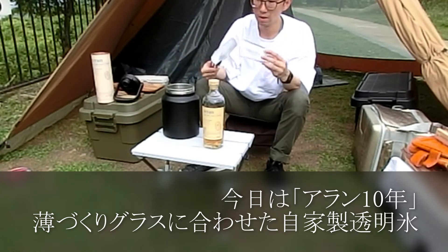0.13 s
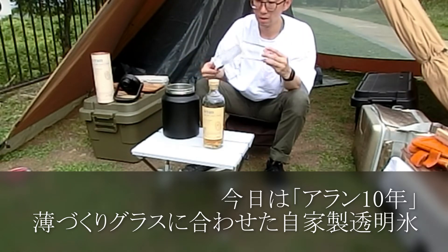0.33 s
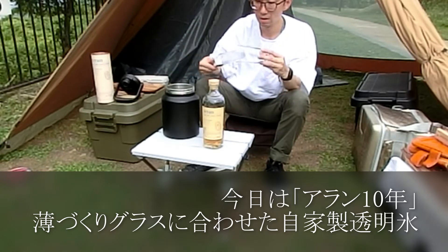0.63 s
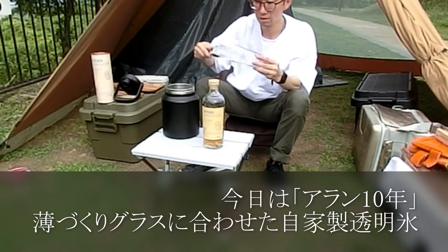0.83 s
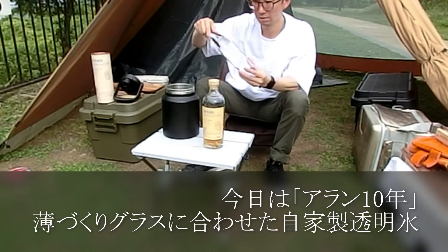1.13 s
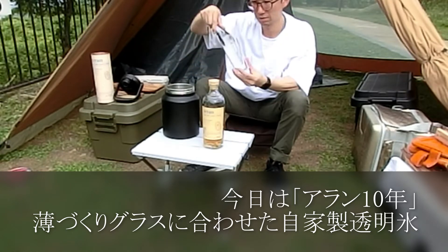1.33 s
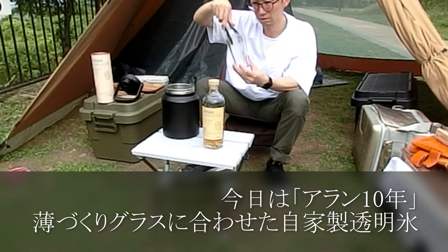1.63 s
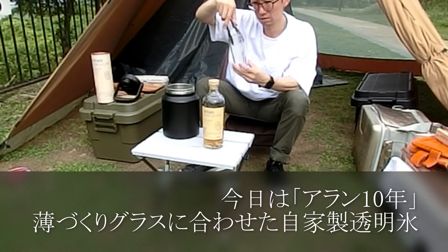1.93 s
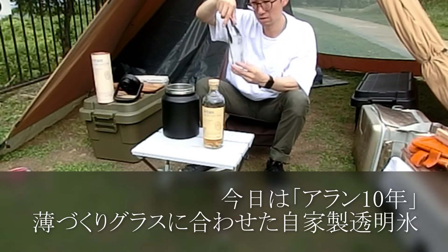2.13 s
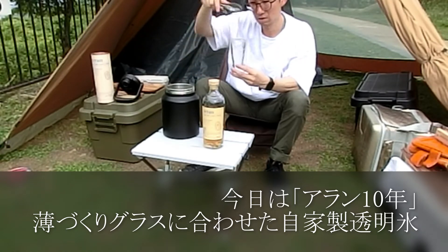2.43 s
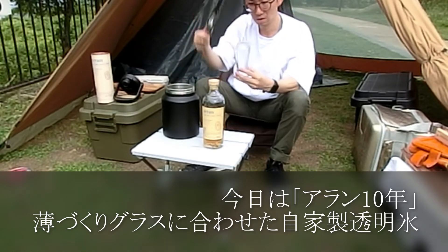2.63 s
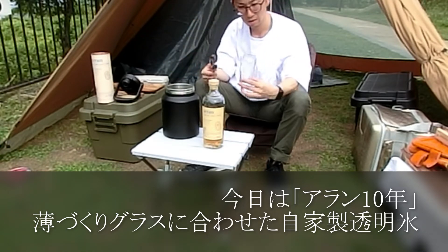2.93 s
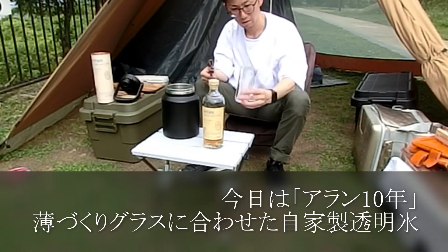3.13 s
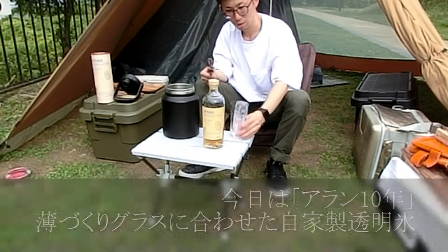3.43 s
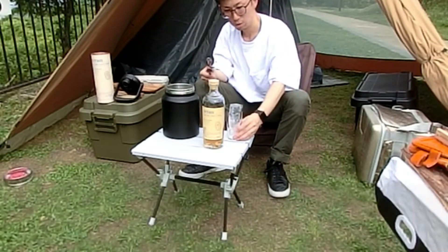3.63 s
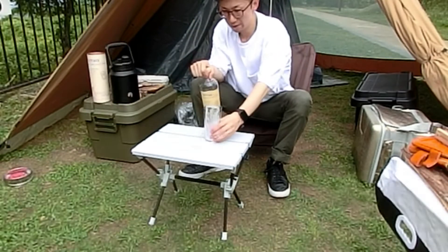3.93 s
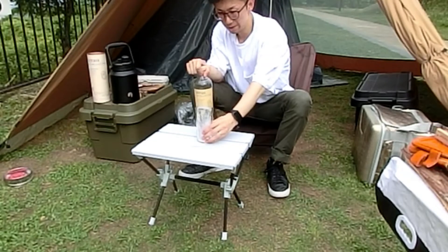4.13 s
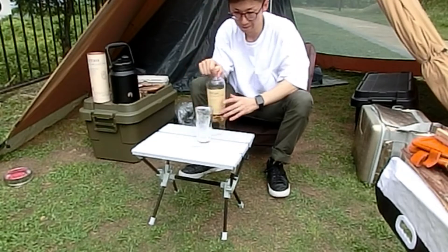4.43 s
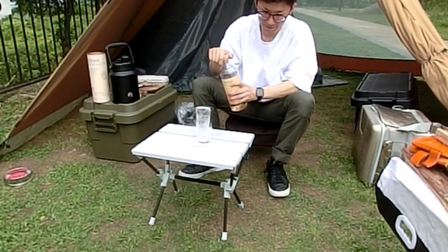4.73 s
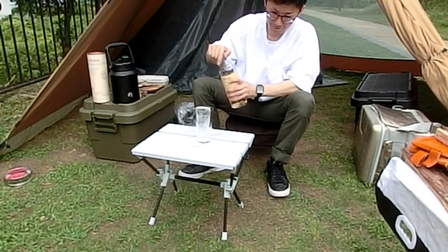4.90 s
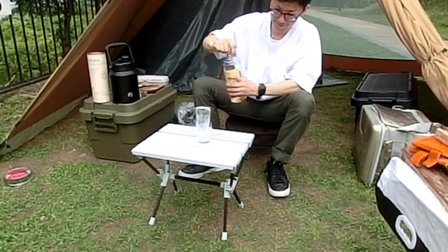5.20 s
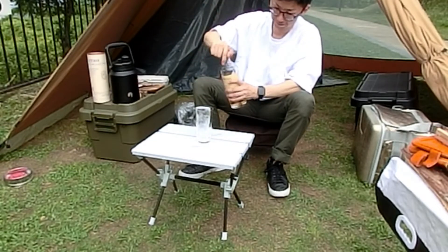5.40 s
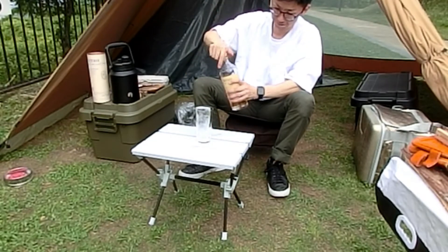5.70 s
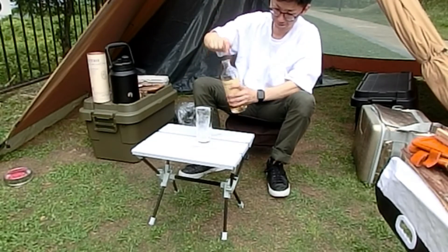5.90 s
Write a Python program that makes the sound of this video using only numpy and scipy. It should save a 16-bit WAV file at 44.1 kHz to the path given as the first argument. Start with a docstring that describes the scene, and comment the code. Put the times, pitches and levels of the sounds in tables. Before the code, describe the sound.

Outdoors at a tent, close to the microphone, steel tongs nudge ice in a thin hand-held glass: bright, quickly damped clinks, small scrapes and clusters of sharp rattles. After a tiny dip in level, a bottle clinks and the glass knocks onto a light table. A bird chirps briefly, hands thud on the bottle, then a cork squeaks twice and comes out with a small hollow pop. Soft low rumble and faint hiss lie underneath.

```python
"""At a tent outdoors, steel tongs settle ice in a thin hand-held glass: clinks, rattles and a scrape.
The glass goes onto a light camping table, a bottle clinks, a bird chirps, then its cork twists and pops.
Hard contacts are noise cracks exciting decaying modes; rattles are runs of such contacts.
The cork is a train of stick-slip pulses, the bird a gliding sine; shaped noise makes the background:
outdoor rumble alike in both ears, under the microphones' own separate hiss."""
import sys
import numpy as np
from scipy import signal
from scipy.fft import rfft, irfft
from scipy.io import wavfile
from scipy.ndimage import uniform_filter1d

SR = 44100
rng = np.random.default_rng(int(sys.argv[2]) if len(sys.argv) > 2 else 0)


def store_pcm(level_fs):
    """Save levels as 16-bit WAV."""
    pcm = np.round(np.clip(level_fs, -1, 1) * 32767).astype(np.int16)
    wavfile.write(sys.argv[1], SR, np.atleast_2d(pcm).T)


N = 267157
T = np.arange(N) / SR
HALF_S = SR // 2  # samples in half a second
TOP_HZ = 15100  # upper limit of the sound
ONSET_S = 0.0026  # t60 of the soft onset of each blow


def undb(db):
    """Amplitude gain is ten to the power of decibels over twenty."""
    return 10 ** (np.asarray(db) / 20)


def unit(x):
    """Normalise power: scale to rms 1."""
    return x / np.sqrt(np.mean(x ** 2) + 1e-24)


def add(out, s, x):
    """Superposition: mix x in from time s."""
    i = int(s * SR)
    out[i:i + len(x)] += x[:max(N - i, 0)]


def colour(x, points):
    """Zero-phase filtering by a (hz, db) spectrum, interpolated over log frequency."""
    hz, db = np.transpose(points)
    f = np.maximum(np.fft.rfftfreq(len(x), 1 / SR), 1)
    gain = undb(np.interp(np.log(f), np.log(hz), db))
    return irfft(rfft(x) * gain, len(x))


def band(x, hz, kind, order=3):
    """Causal Butterworth filtering, maximally flat in its passband."""
    return signal.sosfilt(signal.butter(order, hz, kind, fs=SR, output="sos"), x)


def around(hz, octaves):
    """Band edges at equal musical intervals either side of a centre, kept below TOP_HZ."""
    return np.minimum(hz * 2 ** (octaves * np.array([-1, 1])), TOP_HZ)


def walk(rate):
    """Slow random modulation: smoothed random steps, rate per second, of spread near 1."""
    k = int(SR / rate)
    steps = np.repeat(rng.standard_normal(N // k + 1), k)
    return 1.29 * uniform_filter1d(steps, k)[:N]


def fade(t60, size=HALF_S):
    """Exponential decay by 60 dB in t60 seconds."""
    return np.exp(-np.log(1000) * T[:size] / max(t60, 1e-3))


def gate(t, start, end, edge):
    """Windowing: on from start to end, with straight edges of this many seconds."""
    return np.clip(np.minimum(t - start, end - t) / edge, 0, 1)


def background(swell_db=0.44, pan_db=-0.5):
    """Partly coherent noise: outdoor rumble alike in both ears, under the microphones' separate hiss."""
    # spectrum of the background noise: hz, density_db (per Hz)
    noise_spectrum = [(15, -50), (25, -2), (70, 0.5), (157, -6.5), (620, -12), (1160, -21), (15000, -32)]
    # stereo difference signal: hz, side_db (re middle)
    side_spectrum = [(100, -5.5), (500, -5), (1300, -2), (4000, -0.5)]
    mid, side = (unit(colour(rng.standard_normal(N), noise_spectrum)) for _ in range(2))
    both = mid + colour(side, side_spectrum) * np.array([[1], [-1]])
    balance_db = np.array([[pan_db], [-pan_db]]) / 2
    return both * undb(-56 + swell_db * walk(3.77) + balance_db)


def tone(span, hz, end_db, db_per_s, waver):
    """A sinusoid, wavering in pitch and level, that swells exponentially toward its final level."""
    start, end = span
    phase = 2 * np.pi * np.cumsum(hz * (1 + waver * walk(12))) / SR
    level_db = end_db + db_per_s * np.minimum(T - end, 0) + walk(20)
    return gate(T, start, end, edge=0.0098) * undb(level_db) * unit(np.sin(phase))


def hum():
    """A low sinusoid with frequency modulation: a distant hum that draws nearer."""
    return tone((4.1, 6.14), hz=119.6, end_db=-58, db_per_s=6, waver=0.0149)


def bird(waver=0.021, echo_db=-3.5, echo_t60=0.55):
    """Frequency-modulated chirps, each an arch of pitch; the trees scatter them into a tail."""
    # chirps: top_s (top of the arch), lead_s, tail_s, open_hz, top_hz, level_db (at throat_hz)
    chirps = [(4.133, 0.049, 0.02, 1365, 3290, -43.5), (4.203, .011, 0.055, 3910, 4830, -38),
              (4.318, .024, 0.047, 2607, 2860, -38)]
    arch_s, drop_share = .0165, .32  # half width of an arch; share of the top pitch that it sinks toward
    throat_hz, throat_db_per_octave = 3190, 13  # the bird is loudest near this pitch
    out = np.zeros(N)
    for s, lead, tail, open_hz, top_hz, db in chirps:
        t = np.arange(-lead, tail, 1 / SR)
        away = t ** 2 / (t ** 2 + arch_s ** 2)
        depth_hz = np.where(t < 0, (top_hz - open_hz) / away[0], top_hz * (1 - drop_share))
        hz = top_hz - away * depth_hz
        level_db = db - throat_db_per_octave * np.abs(np.log2(hz / throat_hz))
        level_db = level_db + walk(245)[:len(t)]
        phase = 2 * np.pi * np.cumsum(hz * (1 + waver * walk(500)[:len(t)])) / SR
        add(out, s - lead, undb(level_db) * gate(t, -lead, tail, edge=0.0039) * np.sin(phase))
    trees = [unit(rng.standard_normal(SR) * fade(echo_t60, size=SR)) / np.sqrt(SR) for _ in range(2)]
    return np.array([out + undb(echo_db) * signal.fftconvolve(out, tail)[:N] for tail in trees])


def bottle_tone():
    """A thin sinusoid from the bottle swells and stops."""
    return tone((3.745, 4.014), hz=1761, end_db=-51.5, db_per_s=34, waver=0.00202)


def scuffs(low_hz=170, high_hz=800, grip_db=3):
    """Friction noise: a dull rub of hands that catches and lets go."""
    # hands brushing over glass and bottle: start_s, end_s, level_db
    brushes = [(3.419, 3.471, -54.5), (3.574, 3.683, -56.5), (5.02, 5.115, -56)]
    rub = unit(band(rng.standard_normal(N), [low_hz, high_hz], "bandpass", order=4))
    rub = rub * undb(grip_db * walk(110))
    return rub * sum(undb(db) * gate(T, start, end, edge=0.0099) for start, end, db in brushes)


def ring(modes, freedom=1, scatter_db=0, detune=0, size=HALF_S, split=0.0028):
    """Modal synthesis: decaying modes, each a close unequal pair that beats, excited by chance."""
    grip_hz = 6060  # a grip damps mainly the modes below this
    # where the blow lands sets the strength and sign of each mode
    chance = rng.standard_normal((len(modes), 4))
    turn = 2 * np.pi * T[:size]
    out = 0
    for (hz, db, t60), (a, b, c, d) in zip(modes, chance):
        grip = 1 / (1 + (hz / grip_hz) ** 2)
        decay = fade(t60 * freedom ** grip, size)
        tuning = 1 + detune * b
        pair = np.sin(turn * hz * tuning) + .5 * np.sin(turn * hz * (tuning + split * d))
        out = out + undb(db + scatter_db * a) * np.sign(c) * decay * pair
    return out


def thuds(rough_db=-8):
    """Low-pass excitation: soft blows reach only low, well-damped modes."""
    # dull thuds of handling: start_s, peak_db, pitch_hz
    blows = [(1.5292, -31.5, 700), (3.428, -38.5, 406), (3.583, -38, 384), (3.9435, -30.5, 846),
             (4.038, -37, 205), (5.022, -29.5, 500), (5.024, -34, 240), (5.028, -31, 610),
             (5.0913, -32.5, 540)]
    # modes of a thud: pitch_multiple, level_db (relative), t60_s
    thud_modes = [(.42, -6.5, 0.04), (1, 5, 0.036)]
    out = np.zeros(N)
    for s, db, hz in blows:
        x = unit(ring([(k * hz, mode_db, t60) for k, mode_db, t60 in thud_modes]))
        noise = rng.standard_normal(len(x)) * fade(0.099)
        x = x + undb(rough_db) * unit(band(noise, [hz / 2, 2 * hz], "bandpass", order=2))
        x = band(x, 1.56 * hz, "lowpass", order=4)  # a soft contact has no click
        add(out, s, undb(db) * x / np.abs(x).max())
    return out


def ticks(t60=0.018, octaves=0.35):
    """Broad resonance, quick decay: a small edge snaps into place and is gone in milliseconds."""
    # tiny dry ticks of ice and handling: start_s, peak_db, centre_hz
    snaps = [(1.9392, -19.5, 3450), (2.206, -21, 12000), (2.229, -31.5, 1620), (2.2555, -28, 5200),
             (3.622, -42.5, 3500), (3.665, -44.5, 5070), (5.073, -45.5, 2400)]
    out = np.zeros(N)
    for s, db, hz in snaps:
        noise = rng.standard_normal(HALF_S) * fade(t60)
        x = band(noise, around(hz, octaves), "bandpass", order=2)
        add(out, s, undb(db) * x / np.abs(x).max())
    return out


def voiced(x, bass_db, mid_db, treble_db, size):
    """Contact hardness as spectral balance: set each band's rms over the first samples."""
    bass = band(x, [290, 1450], "bandpass")
    mid = band(x, [1700, 7000], "bandpass", order=4)
    treble = band(x, 7000, "highpass", order=4)
    levels = (bass, bass_db), (mid, mid_db), (treble, treble_db)
    return sum(undb(db) * part / np.std(part[:size]) for part, db in levels)


def favour(x, hz):
    """Position-dependent excitation: the point of contact lifts one region of the spectrum."""
    return x + undb(2) * band(x, around(hz, octaves=0.068), "bandpass", order=1)


def crack(t60, snap_db, snap_t60):
    """Broadband impact: a sharp contact and the dense, quickly dying modes behind it."""
    return rng.standard_normal(HALF_S) * (fade(t60) + undb(snap_db) * fade(snap_t60))


def strikes(rows, modes, ring_db, crack_t60, snap_db, freedom=lambda s: 1,
            heavy_db=-40, damping=0.13, choke_db=-1.5):
    """Impact excitation: each blow checks the last ringing, cracks, and sets the modes ringing anew."""
    out = np.zeros(N)
    for s, mid_db, bass_db, treble_db, focus_hz in rows:
        # a loosely held object rings louder, longer and truer; heavy blows stay in contact and damp it
        free = freedom(s) / max(1, undb(damping * (mid_db - heavy_db)))
        body = ring(modes, free, scatter_db=1.7 / free, detune=0.0037 / free)
        snap = crack(crack_t60, snap_db, snap_t60=0.002)
        blow = np.sqrt(free) * undb(ring_db) * unit(body) + unit(snap)
        blow = favour(blow, focus_hz) * (1 - fade(ONSET_S))
        out *= undb(choke_db * np.clip((T - s) / ONSET_S, 0, 1))
        add(out, s, voiced(blow, bass_db, mid_db, treble_db, size=SR // 50))
    return out


def rattles(rows, modes, rate=210, spread_db=3.8, crack_db=-8, count=3):
    """Repeated micro-impacts: tiny uneven contacts at a few edges, each ringing with its own colour."""
    out = np.zeros(N)
    for start, end, db, bass_db, treble_db in rows:
        size = max(int((end - start) * SR), SR // 100)
        grains = int(rate * size / SR) + 1
        run = 0
        for edge in range(count):
            taps = np.zeros(size)
            taps[rng.integers(0, size, grains)] = undb(spread_db * rng.standard_normal(grains))
            damped = ring(modes, .35, scatter_db=4, detune=.008)
            grain = unit(damped) + undb(crack_db) * unit(crack(0.018, 5.2, 0.0055))
            run = run + signal.fftconvolve(taps, grain)
        add(out, start, undb(db) * voiced(run, bass_db, 0, treble_db, size))
    return out


def table():
    """Damped plate modes: dry knocks, and the glass shifting as a run of small contacts."""
    # knocks and taps: start_s, middle_db, bass_db, treble_db, focus_hz (favoured by the contact point)
    knocks = [(3.5825, -52, -49, -55, 1110), (4.0362, -43, -41, -52, 746), (4.0622, -46.5, -41.5, -49, 814)]
    # the glass shifting: start_s, end_s, level_db (middle), bass_db (re middle), treble_db (re middle)
    slides = [(3.76, 4.1, -65, 8.5, -9)]
    # modes of the table: mode_hz, level_db (relative), t60_s
    table_modes = [(514, 1.7, 0.16), (753, 1.7, 0.13), (1530, -2, 0.052)]
    out = strikes(knocks, table_modes, ring_db=-13.5, crack_t60=0.12, snap_db=17)
    return out + rattles(slides, table_modes)


def neck_tap():
    """Local modal excitation: one small hard tap rings the neck of the bottle."""
    # modes of the neck: mode_hz, level_db (relative), t60_s
    neck_modes = [(3946, 0, 0.08), (8120, -7, 0.056)]
    out = np.zeros(N)
    noise = band(rng.standard_normal(HALF_S) * fade(0.028), neck_modes[0][0], "highpass")
    x = ring(neck_modes) + .5 * noise
    add(out, 4.6135, undb(-36.5) * x * (1 - fade(ONSET_S)))
    return out


def bottle_freedom(s):
    """Contact damping: the factor on the bottle's t60 rises when the grip eases."""
    return 0.47 if s < 3.85 else 1


def bottle():
    """Shell modes under hand damping: the bottle clinking."""
    # blows: start_s, middle_db, bass_db, treble_db, focus_hz (favoured by the contact point)
    hits = [(3.7995, -46.5, -45.5, -44, 2300), (3.8074, -48, -46, -51, 2500), (3.8983, -42, -43, -36, 7380),
            (3.9111, -42, -55, -45, 6520), (3.9442, -50, -42.5, -54, 890)]
    # modes of the bottle: mode_hz, level_db (relative), t60_s
    bottle_modes = [(902, 0, 0.1), (1407, -0.5, 0.062), (2290, 1.5, 0.035), (2540, -3.5, 0.1),
                    (4200, -7, 0.3), (6480, -4.5, 0.15), (7420, 4, 0.056), (9420, -7.5, 0.15),
                    (11170, 2.5, 0.03)]
    return strikes(hits, bottle_modes, ring_db=4.5, crack_t60=0.04, snap_db=-8, freedom=bottle_freedom)


def cork_twists(rub_db=-9, neck_db=1.0, late=1.43, fullness=0.62):
    """Stick-slip friction: the cork's slips form a gliding harmonic pulse train that sounds in the neck."""
    # the cork slipping: start_s, end_s, first_hz (slips per second), last_hz, level_db (before the swell)
    twists = [(5.513, 5.589, 1120, 440, -43.5), (5.897, 5.924, 770, 550, -40.5),
              (5.926, 5.95, 1250, 4600, -40), (5.945, 5.967, 1170, 1080, -50.5)]
    # colour of the cork in the neck: hz, gain_db
    cork_colour = [(300, -5), (1200, -5), (2750, 3.5), (3500, -6), (4700, 4.5), (7000, 0), (7450, 10.5),
                   (7950, -0.5), (15000, -7.5)]
    bend = 1.9  # the glide gathers speed
    roughness, rough_hz = 0.035, 717  # scatter of the slips at this rate
    steepness = 0.17  # power by which overtones fall off at rough_hz; faster slips are purer
    out = np.zeros(N)
    for start, end, first_hz, last_hz, db in twists:
        u = np.linspace(0, 1, int((end - start) * SR), endpoint=False)
        hz = first_hz + (last_hz - first_hz) * u ** bend
        rough = roughness * (rough_hz / hz) ** 2  # slow slips are the least even
        effort = np.sin(np.pi * u ** late) ** fullness
        turns = np.cumsum(hz * (1 + rough * walk(900)[:len(u)])) / SR
        rolloff = steepness * hz / rough_hz
        overtones = ((k * hz < TOP_HZ) * np.cos(2 * np.pi * k * turns) / k ** rolloff for k in range(1, 36))
        slips = sum(overtones) * np.sqrt(hz)
        rub = rng.standard_normal(len(u)) * np.exp(-(turns % 1) / 0.2)
        neck = rng.standard_normal(SR // 50) * fade(0.017, size=SR // 50)  # each slip echoes in the glass
        x = unit(slips) + undb(rub_db) * unit(rub)
        x = x + undb(neck_db) * unit(signal.lfilter(neck, 1, x))
        add(out, start, undb(db) * effort * unit(colour(x, cork_colour)))
    return out


def cork_pop():
    """Cavity resonance: when the cork leaves, the air in the bottle and the glass of its neck ring."""
    # the air in the opened bottle: final_hz, level_db, t60_s
    air_modes = [(268, -35.5, 0.47), (254, -24.5, 0.057)]
    # the glass of the neck: mode_hz, level_db, t60_s
    neck_ring = [(4000, -48.5, 0.2)]
    flat, open_s = 0.55, 0.0046  # share by which the pitch starts flat; time constant of the opening
    out = np.zeros(N)
    shade = np.exp(-T[:HALF_S] / open_s)  # the cork still shades the mouth
    pop = ring(neck_ring)
    for hz, db, t60 in air_modes:
        phase = 2 * np.pi * np.cumsum(hz * (1 - flat * shade)) / SR
        pop = pop + undb(db) * fade(t60) * np.sin(phase)
    add(out, 5.956, pop * (1 - shade))
    return out


def glass():
    """Shell modes under growing damping: the glass rings freely at first, then ice and hand damp it."""
    # ice and tongs: start_s, middle_db, bass_db, treble_db, focus_hz (favoured by the contact point)
    clinks = [(0.7438, -42.5, -41.5, -41.5, 1190), (0.7664, -44, -64, -54, 5230),
              (0.8394, -55, -48, -46.5, 593), (1.0225, -46.5, -52.5, -46.5, 4940),
              (1.109, -59, -61, -62, 2550), (1.149, -58, -72, -53.5, 7600),
              (1.3314, -54, -53.5, -52.5, 1120), (1.3395, -46.5, -60, -50, 2540),
              (1.3504, -51, -68, -52, 3380), (1.3994, -55, -73, -53, 7600), (1.5502, -53, -58, -70, 5100),
              (1.859, -57, -63.5, -52, 8200), (1.9402, -41.5, -37.5, -35.5, 1100),
              (1.951, -39.5, -51, -34, 11100), (1.9658, -47, -51.5, -47, 3000),
              (2.1625, -47.5, -60.5, -44, 6200), (2.189, -42, -45, -43, 5200),
              (2.1999, -37.5, -48, -46, 5950), (2.2058, -36.5, -47, -34.5, 6170),
              (2.2174, -37, -46, -36.5, 5940), (2.3058, -52, -49.5, -55, 766),
              (2.3825, -44.5, -50.5, -44, 8200), (2.4698, -63, -60.5, -56, 5050),
              (2.5408, -61.5, -62.5, -57, 5140), (2.7871, -63, -52, -70, 800),
              (2.853, -43.5, -48, -45, 7750), (2.8925, -45, -50.5, -47, 4950),
              (3.047, -53.5, -54.5, -65, 2035), (3.158, -36, -39.5, -41, 2850),
              (3.1678, -35, -46, -42, 4950), (3.2147, -44, -50.5, -48, 4800),
              (3.2377, -51.5, -52.5, -56, 4930)]
    # ice along the wall: start_s, end_s, level_db (middle), bass_db (re middle), treble_db (re middle)
    chatter = [(0.86, 1.09, -65.5, -5, 0), (0.925, 1.0, -62, -10, 13.5), (1.968, 1.989, -48, -5, -3),
               (2.218, 2.256, -39, -7.5, -6), (3.161, 3.187, -40, -12, -14)]
    # modes of the glass, with one of the ice in it (2750 Hz): mode_hz, level_db (relative), t60_s
    glass_modes = [(591, 0, 0.051), (735, 3, 0.03), (1112, 0, 0.085), (2031, -4.5, 0.13),
                   (2750, -1.5, 0.018), (3378, -7.5, 0.22), (4926, -0.5, 0.069), (5070, -1.5, 0.03),
                   (5220, -1.5, 0.095), (5943, -2.5, 0.069), (7666, 4.5, 0.065), (9500, 5.5, 0.045),
                   (10200, 5.5, 0.064), (11080, 9, 0.028), (13330, 9.5, 0.041)]
    free, held, settle_s = 3.5, 0.64, 0.046  # factors on t60; time constant between them

    def freedom(s):
        """Damping sets in exponentially after the first touch: the factor on t60 at time s."""
        return held + (free - held) * np.exp(-(s - clinks[0][0]) / settle_s)

    out = strikes(clinks, glass_modes, ring_db=6.5, crack_t60=0.06, snap_db=-10, freedom=freedom)
    return out + rattles(chatter, glass_modes)


def contacts():
    """Superposition of every hard contact of ice, glass, bottle and table."""
    return table() + ticks() + neck_tap() + bottle() + glass()


def campsite(x, pan_db=-2.5, early_db=-13, early_t60=0.18, late_db=-22, late_t60=0.33):
    """Reverberation: direct sound from slightly right, reflections off table and tent, a faint dull tail."""
    channels = []
    for direct_db in (pan_db / 2, -pan_db / 2):
        early, late = rng.standard_normal((2, HALF_S)) * (T[:HALF_S] > .001)
        dull = band(late * fade(late_t60), 3400, "lowpass", order=1)
        echo = undb(early_db) * unit(early * fade(early_t60)) + undb(late_db) * unit(dull)
        reflected = signal.fftconvolve(x, echo / np.sqrt(len(echo)))[:N]
        channels.append(undb(direct_db) * x + reflected)
    return np.array(channels)


def level_dip():
    """Amplitude modulation: the level dips briefly."""
    centre_s, hold_s, fade_s, floor_db = 3.725, 0.0047, 0.029, -25
    return np.clip((np.abs(T - centre_s) - hold_s) / fade_s, undb(floor_db), 1)


def scene():
    """Superposition of all the handling sounds over the outdoor background."""
    # colour of the left channel: hz, gain_db
    left_colour = [(7000, 0), (11500, 1.5), (13800, -3.5)]
    far = bird() + background() + hum()
    handling = contacts() + thuds() + scuffs() + cork_twists() + cork_pop()
    near = campsite(handling) + bottle_tone()
    # each blow radiates its own lobed pattern, so the two ears hear it a little differently
    left, right = near + undb(-16) * contacts() * np.array([[1], [-1]])
    return (np.array([colour(left, left_colour), right]) + far) * level_dip()


def record(dry):
    """Band limiting: the recorder's steep elliptic low-pass cuts the top."""
    return signal.sosfilt(signal.ellip(8, .2, 70, TOP_HZ, fs=SR, output="sos"), dry)


dry = scene()
out = record(dry)
store_pcm(out)
```